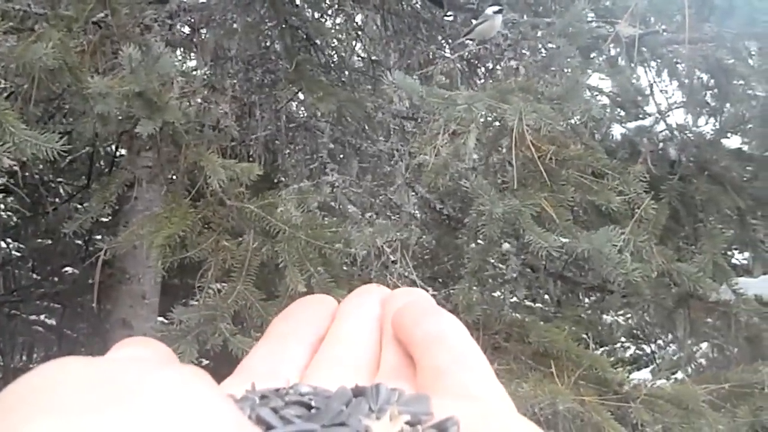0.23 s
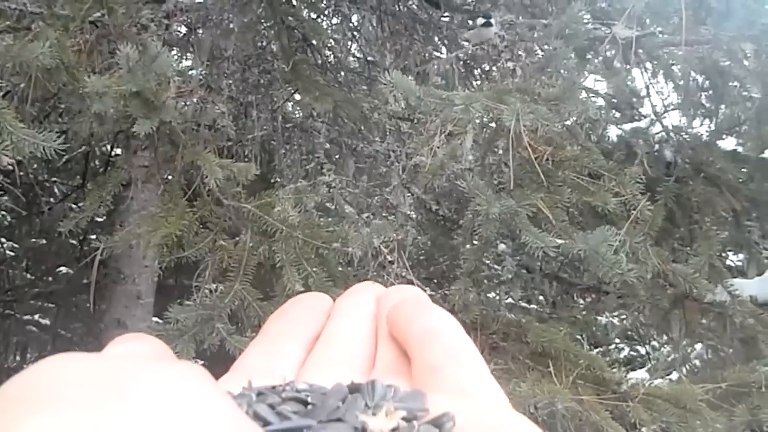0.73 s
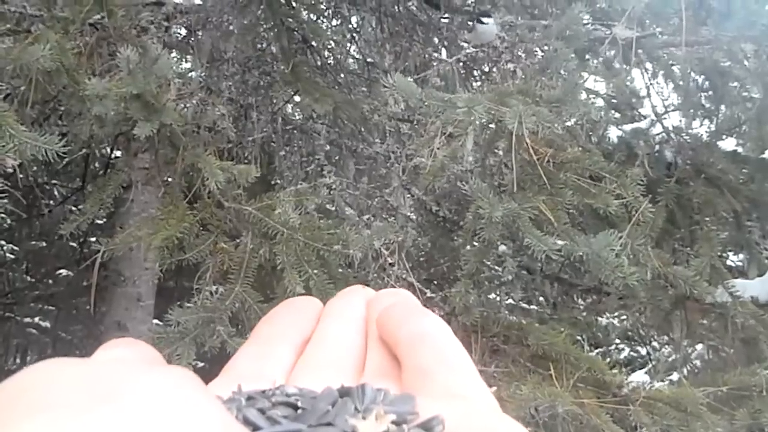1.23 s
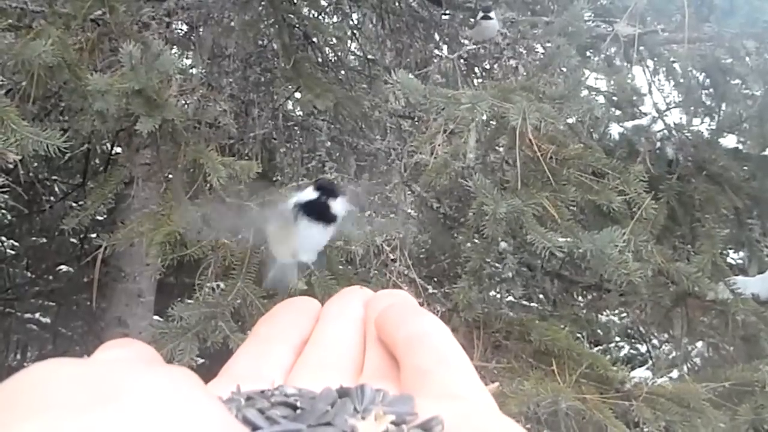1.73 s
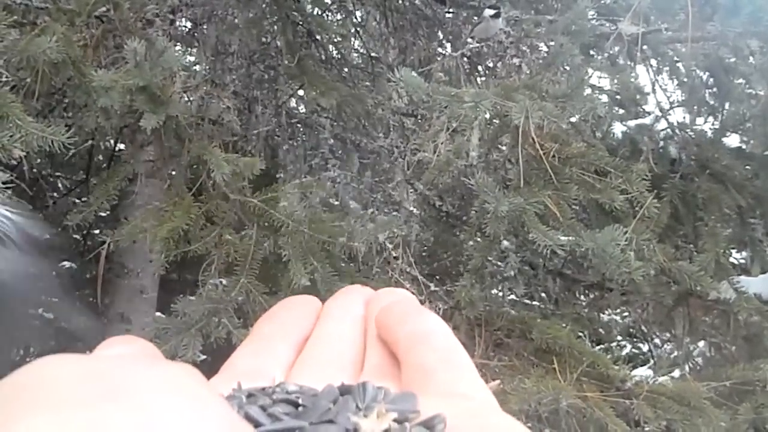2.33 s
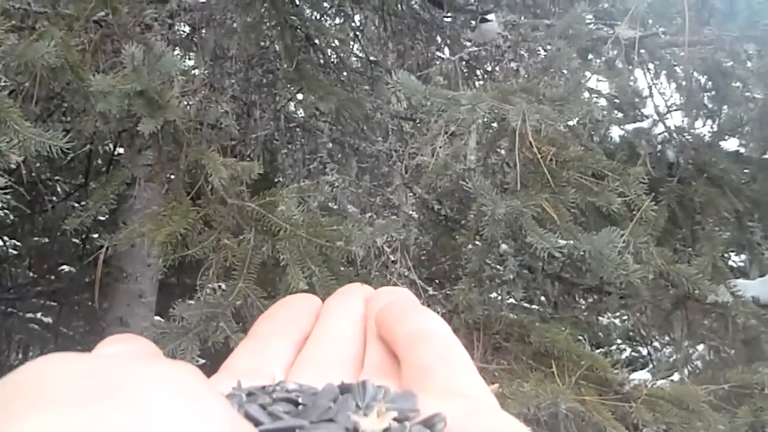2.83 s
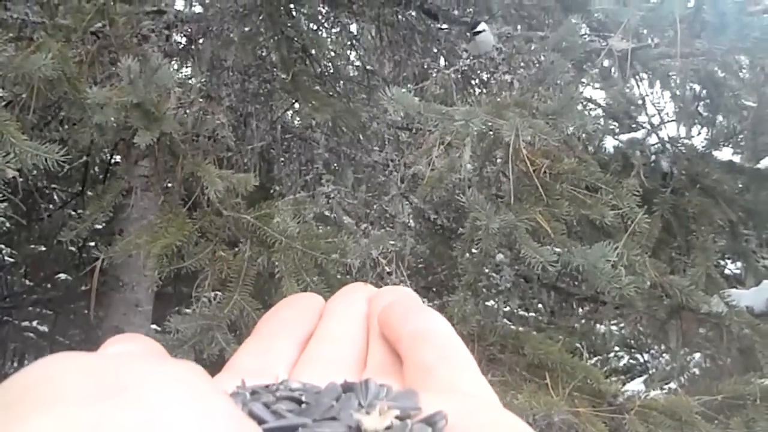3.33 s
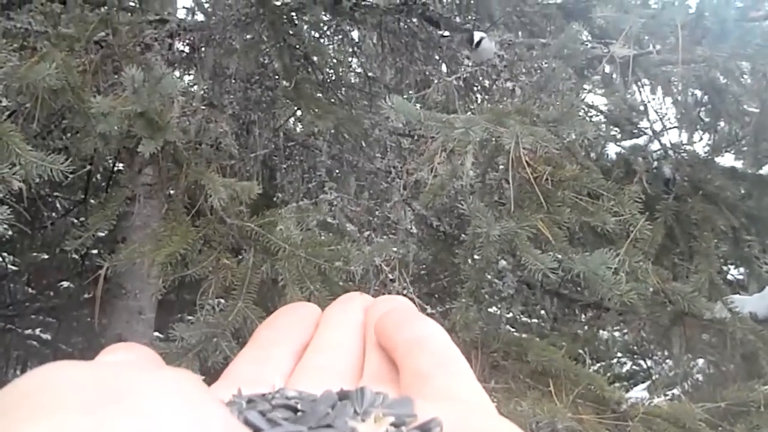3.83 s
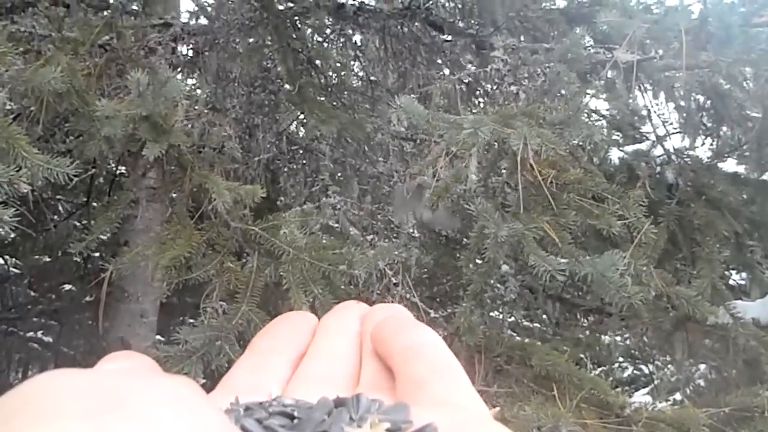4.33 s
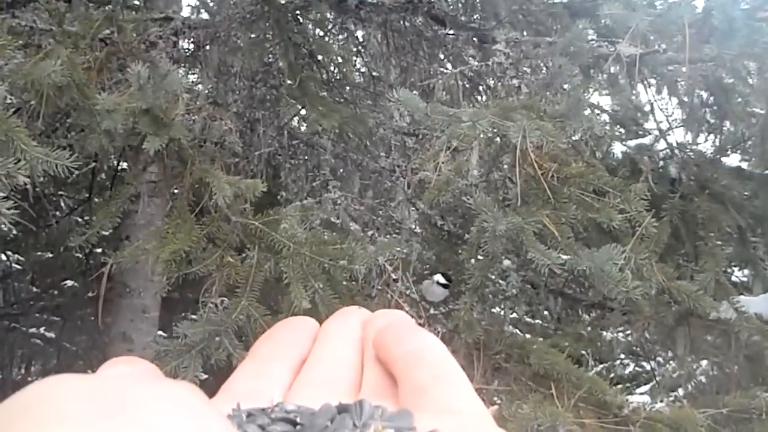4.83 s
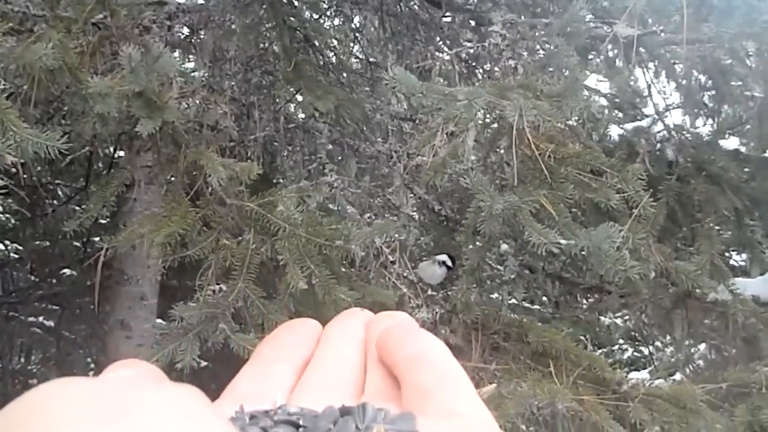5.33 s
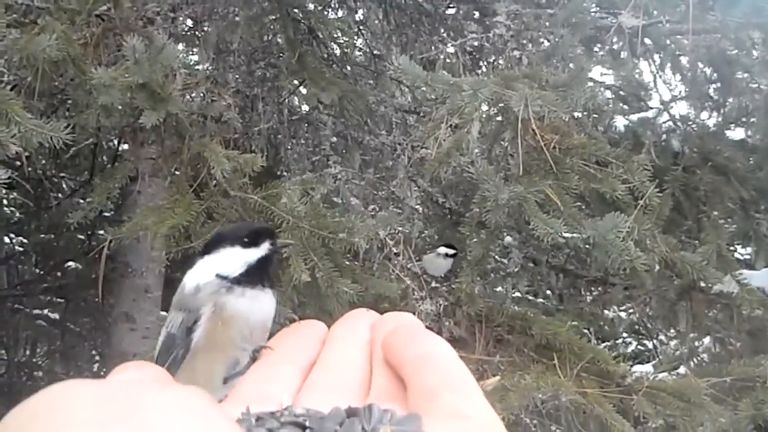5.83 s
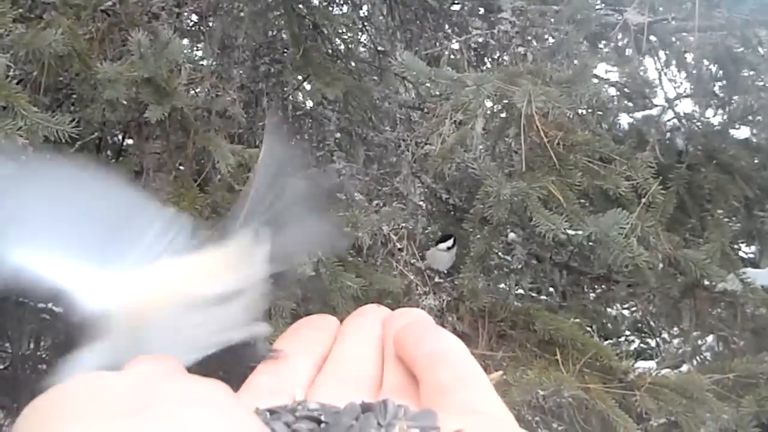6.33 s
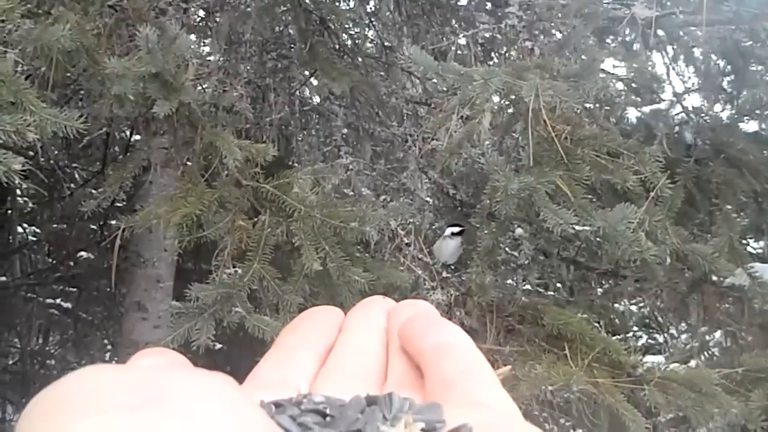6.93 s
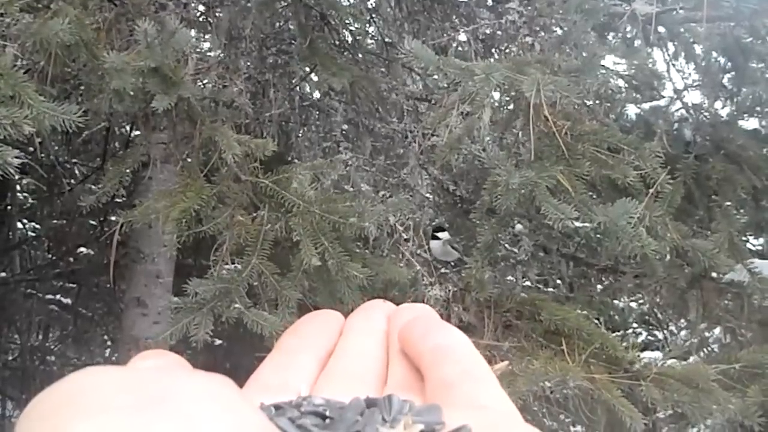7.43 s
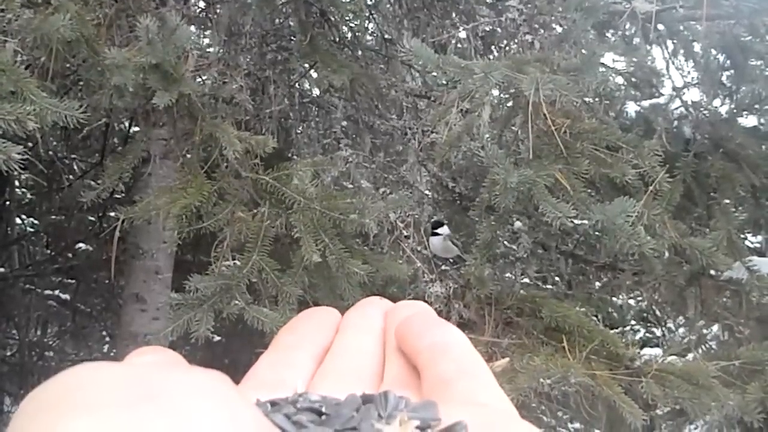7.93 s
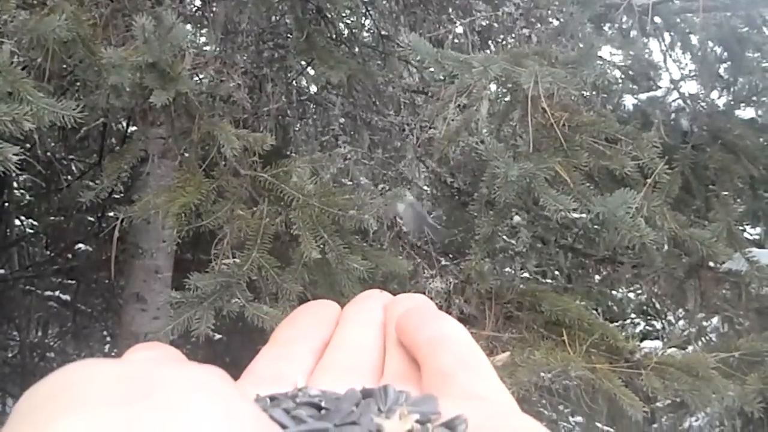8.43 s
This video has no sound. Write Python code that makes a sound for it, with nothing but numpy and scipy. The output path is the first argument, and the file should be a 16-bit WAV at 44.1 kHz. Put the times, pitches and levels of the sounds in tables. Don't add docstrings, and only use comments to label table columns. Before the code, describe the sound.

Chickadees give thin, high seet notes and one quick close gargle in a quiet winter wood, with feather flutters, two hollow beak taps and faint hiss.

```python
import sys
import numpy as np
from scipy import signal
from scipy.fft import rfft, irfft, next_fast_len
from scipy.io import wavfile
from scipy.ndimage import uniform_filter1d

SR = 44100
rng = np.random.default_rng(int(sys.argv[2]) if len(sys.argv) > 2 else 0)


def volts(x):
    e = np.asarray(x, float) / 20
    return 10 ** e


def output_pcm(signal):
    pcm = np.clip(np.atleast_2d(signal).T, -1, 1) * 32767
    wavfile.write(sys.argv[1], SR, np.round(pcm).astype(np.int16))


N = 382347


def rms_one(x):
    return x / np.sqrt(np.mean(x ** 2) + 1e-20)


def resonance(x, hz, width_hz):
    r = np.exp(-np.pi * width_hz / SR)
    zeros = [(1 - r * r) / 2, 0, (r * r - 1) / 2]
    poles = [1, -2 * r * np.cos(2 * np.pi * hz / SR), r * r]
    return signal.lfilter(zeros, poles, x)


def ring(hz, t60, seconds):
    t = np.arange(int(seconds * SR)) / SR
    return np.sin(2 * np.pi * hz * t) * volts(-60 * t / t60)


def add(out, s, piece):
    i = round(s * SR)
    out[i:i + len(piece)] += piece[:N - i]


NOTE_LEAD_S = .002


def whistle(note, overtone_db, wobble, flutter_db):
    s, hz, db = np.transpose(note)
    t = np.arange(s[0] - NOTE_LEAD_S, s[-1] + NOTE_LEAD_S, 1 / SR)
    tremor = uniform_filter1d(rng.standard_normal((2, 4000)), size=40, axis=1)[:, :len(t)] * np.sqrt(40)
    pitch = uniform_filter1d(np.interp(t, s, hz), size=27) * (1 + wobble * tremor[0])
    level = uniform_filter1d(np.interp(t, s, volts(db)), size=27) * volts(flutter_db * tremor[1])
    edges = np.clip(np.minimum(t - t[0], t[-1] - t) / 0.0024, 0, 1) ** 2
    phase = 2 * np.pi * np.cumsum(pitch) / SR
    return np.sqrt(2) * level * edges * (np.sin(phase) + volts(overtone_db) * np.sin(2 * phase))


CLIMB_BEND, HOLD_S = 2.63, 0.0042
TAIL_HZ, END_HZ, SETTLE_S, SETTLE_DB = 4980, 4570, 0.0037, -6.5
LINGER_DB, LINGER_S = -43, .0015


def seet(row, habit):
    s, climb_s, top_hz, db, tail_db = row
    climb_hz, onset_db, attack_s, fade, fall_s, bend, dip_db, _ = habit
    dived = climb_s + fall_s
    t = np.arange(0, dived, .001)
    climb = climb_hz * np.maximum(1 - t / climb_s, 0) ** CLIMB_BEND
    fall = (top_hz - TAIL_HZ) * np.maximum((t - climb_s) / fall_s, 0) ** bend
    hz = top_hz - climb - fall
    top_db = db - fade * (climb_s - attack_s - HOLD_S)
    level = np.interp(t, [0, attack_s, attack_s + HOLD_S, climb_s, climb_s + 0.81 * fall_s, dived],
                      [db + onset_db, db, db, top_db, (top_db + tail_db) / 2 + dip_db, tail_db])
    settled = dived + SETTLE_S + LINGER_S * max(tail_db - LINGER_DB, 0)
    end = [(dived, TAIL_HZ, tail_db), (settled, END_HZ, tail_db + SETTLE_DB)]
    return np.vstack([np.transpose([t, hz, level])[:-1], end]) + [s, 0, 0]


# t/s, climb/s, top f/Hz, peak level/dB, tail level/dB
SHORT_SEETS = [(2.01, .027, 7220, -38, -43.5), (4.79, .025, 7150, -38.5, -45),
               (5.591, .022, 7180, -39, -51), (6.036, .025, 7170, -40.5, -51),
               (6.889, .025, 7220, -40.2, -49), (7.8445, .0225, 7440, -38, -39.5)]
# t/s, climb/s, top f/Hz, peak level/dB, tail level/dB
LONG_SEETS = [(1.483, 0.04, 7460, -42, -53), (1.893, .033, 7150, -58, -75), (5.197, .034, 7370, -61, -75),
              (6.925, 0.042, 7000, -39, -80), (7.528, .03, 7460, -54, -75)]
# t/s, climb/s, top f/Hz, peak level/dB, tail level/dB
SINGLE_SEETS = [
    (1.106, 0.014, 7280, -38, -49.5),
    (3.9875, 0.031, 7760, -33, -60),
    (5.762, .046, 7360, -40.5, -49),
]
# climb f/Hz, onset level/dB, attack/s, fade/(dB per s), fall/s, bend of the fall,
# dip level/dB in the fall, echo level/dB
HABITS = [
    (430, -4.5, .008, 560, .0145, 1.4, -5.5, -24),
    (720, -11, .013, 220, .007, 1.3, -4, -17),
    (600, -10, .007, 300, .033, 2.4, -4, -25),
    (1000, -7, .007, 420, .015, 1.7, -1, -26),
    (980, -14, .015, 700, .007, 1.1, 3, -8),
]


def contact_notes():
    groups = [SHORT_SEETS, LONG_SEETS] + [[row] for row in SINGLE_SEETS]
    calls = [(seet(row, habit), habit[-1]) for rows, habit in zip(groups, HABITS) for row in rows]
    return [(note, whistle(note, -36, 0.0038, 0.73), echo_db) for note, echo_db in calls]


SLUR_PEAK_AT, SLUR_START_DB, SLUR_END_DB = .52, -13, -15


def slur(s, length_s, from_hz, to_hz, db):
    peak_hz = from_hz + SLUR_PEAK_AT * (to_hz - from_hz)
    return [(s, from_hz, db + SLUR_START_DB), (s + SLUR_PEAK_AT * length_s, peak_hz, db),
            (s + length_s, to_hz, db + SLUR_END_DB)]


def overtone(note, db):
    mean_khz = np.mean(note, axis=0)[1] / 1000
    return db - 20 * max(mean_khz - 3.5, 0)


# t/s, f/Hz, level/dB
GARGLE = [
    [(2.403, 7380, -64.4), (2.408, 6870, -30.9), (2.421, 6690, -23.5), (2.435, 6660, -23),
     (2.445, 6300, -36.5), (2.449, 5470, -35), (2.456, 4480, -42), (2.472, 4350, -64.4)],
    [(2.517, 8200, -50.9), (2.522, 8700, -55.1), (2.527, 7300, -39), (2.531, 6830, -30.7),
     (2.534, 7260, -64.4)],
    [(2.586, 5800, -62.1), (2.589, 5810, -23), (2.591, 4900, -18.9), (2.598, 5590, -28.9),
     (2.612, 5560, -24.5), (2.626, 5570, -21.5), (2.634, 5620, -25), (2.6396, 5300, -22.5),
     (2.642, 3800, -39)],
    [(2.6985, 4460, -41.1), (2.7005, 4880, -27.5), (2.703, 5080, -39), (2.711, 5950, -34),
     (2.716, 5800, -31), (2.72, 5980, -30.2), (2.7225, 5120, -26), (2.724, 3760, -64.4)],
    [(2.747, 3240, -49.5), (2.755, 3700, -49.0), (2.76, 3710, -37.4), (2.772, 3845, -35.4),
     (2.781, 3840, -39.2), (2.784, 3700, -57.3)],
]
# t/s, length/s, from f/Hz, to f/Hz, peak level/dB
SLURS = [(2.5368, .0018, 3700, 5000, -28), (2.5386, .002, 7160, 5000, -29),
         (2.539, 0.0036, 5100, 4900, -25), (2.55, 0.014, 4150, 4300, -38),
         (2.6825, 0.0081, 3750, 3650, -43), (2.695, .004, 2590, 4300, -37.5),
         (2.707, 0.0075, 4730, 4200, -40), (2.735, 0.0091, 3250, 2900, -44.5),
         (2.788, .015, 5500, 2400, -50)]


def close_gargle():
    slurs = [slur(*row) for row in SLURS]
    voiced = [(note, -39) for note in GARGLE] + [(note, overtone(note, -3)) for note in slurs]
    return [(note, whistle(note, overtone_db, .002, 0.34), -29) for note, overtone_db in voiced]


# t/s, f/Hz, level/dB
FAR_GARGLE = [
    [(0.262, 4180, -64.4), (0.272, 4460, -45), (0.277, 4610, -39.5), (0.284, 4550, -64.4)],
    [(0.276, 3580, -54), (0.29, 3700, -51), (0.303, 3680, -51.8), (0.316, 3250, -58.1)],
    [(0.413, 3120, -53.6), (0.422, 3140, -46), (0.435, 3070, -57), (0.447, 3130, -58.0), (0.457, 2900, -51),
     (0.468, 2720, -53), (0.481, 2250, -54)],
]
# t/s, length/s, from f/Hz, to f/Hz, peak level/dB
FAR_SLURS = [(0.243, .015, 5020, 5850, -53), (.349, .036, 7500, 7950, -60), (.401, .008, 3050, 3650, -45),
             (.577, 0.017, 2240, 2160, -47.5), (0.587, 0.04, 2135, 1970, -53.5),
             (0.591, .032, 2460, 2320, -56)]


def far_gargle():
    notes = FAR_GARGLE + [slur(*row) for row in FAR_SLURS]
    return [(note, whistle(note, overtone(note, -12), .015, 2.5), -12) for note in notes]


BOUGH_T60_S, TRUNK_T60_S, FAR_TRUNK_DB = 0.077, 0.33, -14


def trunks():
    t = np.arange(int(.3 * SR)) / SR
    decay = volts(-60 * t / BOUGH_T60_S) + volts(FAR_TRUNK_DB - 60 * t / TRUNK_T60_S)
    echoes = rng.standard_normal(len(t)) * (rng.random(len(t)) < .08) * decay
    echoes = echoes * np.clip(t / 0.01, 0, 1)
    return echoes / np.sqrt(np.sum(echoes ** 2))


def voices():
    straight, scattered = np.zeros(N), np.zeros(N)
    for note, tone, echo_db in contact_notes() + close_gargle() + far_gargle():
        start = note[0][0] - NOTE_LEAD_S
        add(straight, start, tone)
        add(scattered, start, volts(echo_db) * tone)
    return straight + signal.fftconvolve(scattered, trunks())[:N]


# t/s, rub level/dB, length/ms
RASP = [(.28, -50, 22), (.298, -50, 10), (.304, -55, 26), (.408, -51, 20), (.419, -48, 12), (.429, -46, 17),
        (.442, -51.5, 40), (.566, -59, 30), (.588, -58, 22)]
# t/s, rub level/dB, length/ms, low rustle level/dB
RUFFLE = [(2.526, -51, 12, -10), (2.538, -45.5, 18, -4), (2.553, -46, 5, -7), (2.569, -44, 13, -6),
          (2.5745, -49, 7.1, -1), (2.644, -44.5, 15, -22), (2.661, -49, 8, -13), (2.681, -53, 5, -12),
          (2.725, -47, 22, -14), (2.748, -50, 12, -12), (2.779, -48, 16, -3), (2.791, -51, 16, -1)]
# t/s, rub level/dB, length/ms
STROKES = [(1.73, -50.5, 12), (1.829, -57, 16), (2.98, -56, 12), (5.868, -56, 22), (5.905, -55, 44),
           (5.979, -55, 10), (6.29, -52.5, 26), (6.522, -61, 16), (6.535, -55, 7.3), (6.559, -52, 8),
           (6.567, -53, 30), (6.631, -49, 14)]
# t/s, rub level/dB, length/ms
SCUFFS = [(2.0375, -49, 4), (2.5163, -48, 5), (6.5003, -54, 4.4), (6.505, -42.5, 6.3), (6.5067, -56, 4)]
FLIGHT_S, BEAT_S, BEAT_DB, BEAT_LOSS_DB, BEAT_MS, BEAT_SHRINK = 6.59, .0398, -45, 2.4, 22, 0.84
# low, high, snap level/dB
RASP_SHARE, STROKE_SHARE, SCUFF_SHARE = (-17, -21, -17), (-11, -18, -5), (-15, -9, -10)


def feather_events():
    beats = [(FLIGHT_S + k * BEAT_S, BEAT_DB - k * BEAT_LOSS_DB, BEAT_MS * BEAT_SHRINK ** k) for k in range(6)]
    rows = [(*row, *RASP_SHARE) for row in RASP]
    rows += [(*row, *STROKE_SHARE[1:]) for row in RUFFLE]
    rows += [(*row, *STROKE_SHARE) for row in STROKES + beats]
    return rows + [(*row, *SCUFF_SHARE) for row in SCUFFS]


# f/Hz, width/Hz
FEATHER = [
    (4780, 1050),
    (2600, 3000),
    (7600, 5500),
]
# t/s, snap level/dB
SNAPS = [(2.0388, -45), (2.5163, -40), (2.538, -45), (2.5745, -44), (2.681, -48), (6.5003, -41),
         (6.505, -37), (6.5067, -36), (6.5934, -34), (6.6352, -39)]
SNAP_SHAPE = 4300, 3000


def wings():
    bands, clicks = np.zeros((3, N)), np.zeros(N)
    t, rows = np.arange(2600) / SR, feather_events()
    size = (len(rows), len(t))
    grains = rng.standard_normal(size) * volts(5.0 * rng.standard_normal(size))
    snaps = list(SNAPS)
    for (s, rub_db, length_ms, low_db, high_db, snap_db), grain in zip(rows, grains):
        swell = np.sin(np.pi * np.clip(t / (length_ms / 1000), 0, 1) ** 0.61)
        stroke = volts(rub_db + 13.5) * swell * rms_one(grain)
        snaps.append((s, rub_db + snap_db))
        for band, share_db in zip(bands, (0, low_db, high_db)):
            add(band, s, volts(share_db) * stroke)
    for s, snap_db in snaps:
        add(clicks, s, volts(snap_db + 21) * np.ones(1))
    out = np.zeros(N)
    for source, shape in zip([*bands, clicks], [*FEATHER, SNAP_SHAPE]):
        out += resonance(resonance(source + 1e-18, *shape), *shape)
    return out


# t/s, peak level/dB, hardness/(dB per octave), push or pull
TAPS = [
    (6.186, -8.5, -0.4, 0.69),
    (8.621, -13.5, -6.5, -0.74),
]
# f/Hz, level/dB, t60/s, delay/ms
BODY = [(423, -22, 0.02, 1.78), (695, -12.5, 0.04, 1.225), (870, -14, 0.012, 1.42), (1610, 1, 0.003, .01),
        (2076, -4, 0.0066, .01), (2900, -11, 0.0033, .01), (3750, -7.5, 0.0082, .01),
        (4440, -25, 0.026, .01), (5360, -37, .006, 0.18)]


def taps():
    out = np.zeros(N)
    for s, peak_db, hard_db, sign in TAPS:
        for hz, db, t60, delay_ms in BODY:
            mode_db = peak_db + db + hard_db * np.log2(hz / 690)
            add(out, s + delay_ms / 1000, sign * volts(mode_db) * ring(hz, t60, .08))
    return signal.sosfilt(signal.butter(4, [320, 5000], "band", fs=SR, output="sos"), out)


# t/s, peak level/dB, ring f/Hz
BUMPS = [(2.565, -54, 60), (3.205, -54, 49.7), (3.399, -50, 70.5), (5.602, -38.5, 188), (5.6, -56, 60),
         (6.144, -40, 112), (6.19, -55, 59), (6.388, -39.5, 150), (6.398, -46, 70), (6.517, -31.5, 188),
         (6.518, -44, 70), (7.84, -47, 105), (8.321, -52, 129), (8.39, -44, 75), (8.62, -55, 45),
         (8.661, -48, 110), (6.036, -48, 110), (6.6, -58, 70), (6.67, -56, 80), (5.53, -55, 70)]


def bumps():
    out = np.zeros(N)
    for s, peak_db, hz in BUMPS:
        thud = ring(hz, 3.37 / hz, .15)
        swell = np.clip(np.arange(len(thud)) * hz / SR / 0.91, 0, 1)
        add(out, s, volts(peak_db + 8) * thud * swell)
    return out


# f/Hz, level/(dB per Hz)
HISS = [(12, -43), (20, -16), (85, -10.5), (206, -2.5), (443, 0), (481, -1), (615, -1.5), (954, -4),
        (1400, -7), (2560, -10), (6500, -13.5), (8550, -14), (14000, -15.5)]
HISS_DB, CUTOFF_HZ = -51.5, 14300


def hiss():
    size = next_fast_len(N)
    hz = np.maximum(np.fft.rfftfreq(size, 1 / SR), 1)
    points_hz, points_db = np.transpose(HISS)
    shape = volts(np.interp(np.log(hz), np.log(points_hz), points_db))
    noise = irfft(rfft(rng.standard_normal(size)) * shape * (hz < CUTOFF_HZ), size)
    return volts(HISS_DB) * rms_one(noise[:N])


# t/s, low f/Hz, high f/Hz, level/dB
UNLIKE_NOTES = [
    (2.634, 4300, 7140, -61),
    (5.8, 6260, 8150, -53),
]
UNLIKE_PER_S, UNLIKE_DB, UNLIKE_LOW_HZ, UNLIKE_HIGH_HZ, UNLIKE_WIDTH_HZ = 4.6, -69.5, 4150, 12900, 1450


def unlike_patches():
    out, hz = np.zeros(N), np.fft.rfftfreq(2048, 1 / SR)
    patches = list(UNLIKE_NOTES)
    for s in np.arange(418 + 1024, N - 1024, 1024) / SR:
        draw, place, wide = rng.random(3)
        if draw < UNLIKE_PER_S * 1024 / SR:
            low_hz = UNLIKE_LOW_HZ + (UNLIKE_HIGH_HZ - UNLIKE_LOW_HZ) * place
            high_hz = low_hz + UNLIKE_WIDTH_HZ * (.7 + .7 * wide)
            patches.append((s, low_hz, high_hz, UNLIKE_DB + 3 * (wide - .5)))
    swell = np.sin(np.pi * np.arange(2048) / 2048)
    for s, low_hz, high_hz, db in patches:
        band = irfft(rfft(rng.standard_normal(2048)) * (hz > low_hz) * (hz < high_hz))
        add(out, s - 1024 / SR, volts(db) * rms_one(band) * swell)
    return out * [[1], [-1]]


def scene():
    mono = voices() + wings() + taps() + bumps() + hiss()
    return np.array([mono, mono])


def band_limit(x):
    return signal.sosfilt(signal.butter(12, 15440, fs=SR, output="sos"), x)


def record(dry):
    top_cut = signal.ellip(12, .3, 95, CUTOFF_HZ - 120, fs=SR, output="sos")
    mix = signal.sosfilt(top_cut, dry) + unlike_patches()
    return band_limit(mix)


dry = scene()
out = record(dry)
output_pcm(out)
```